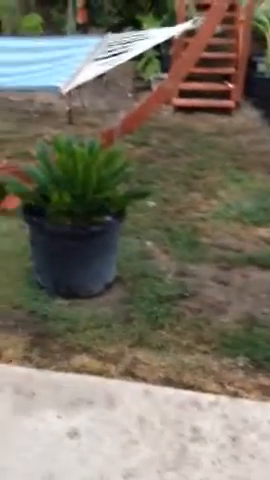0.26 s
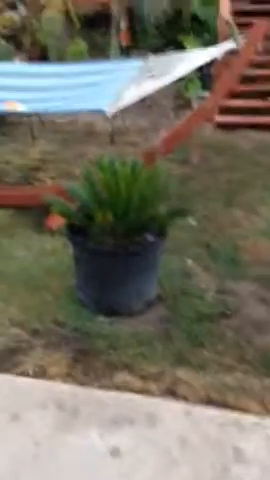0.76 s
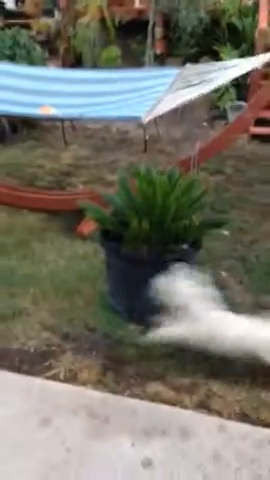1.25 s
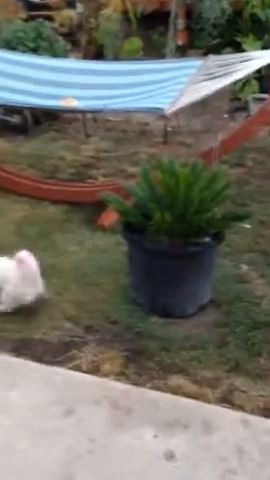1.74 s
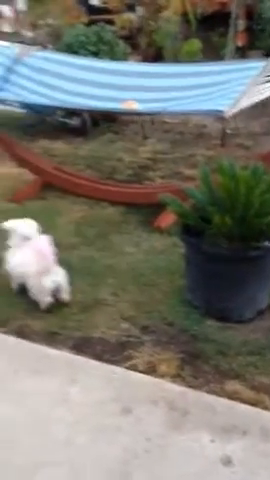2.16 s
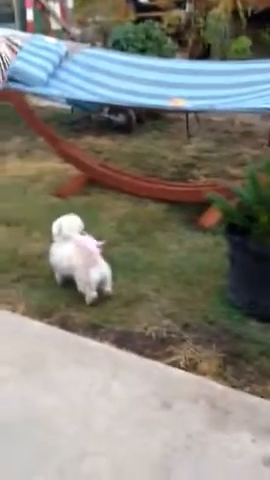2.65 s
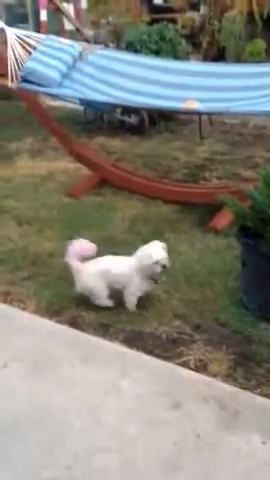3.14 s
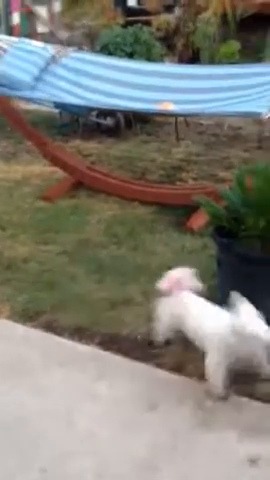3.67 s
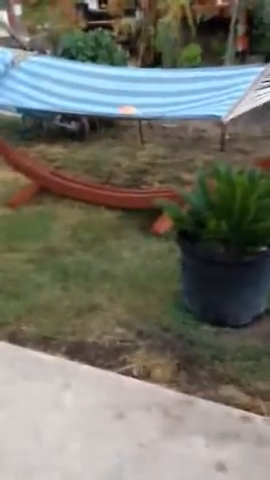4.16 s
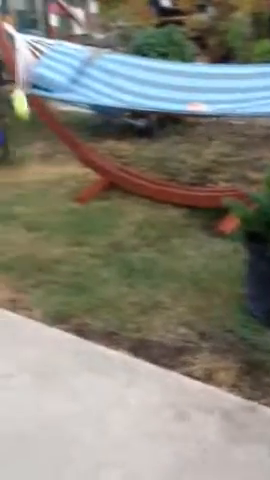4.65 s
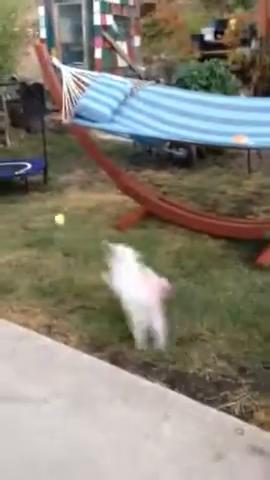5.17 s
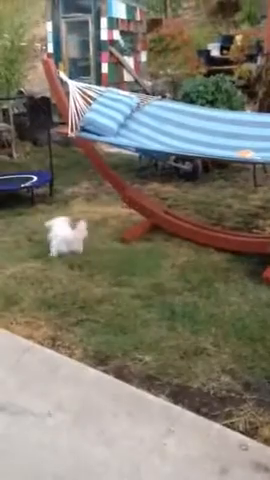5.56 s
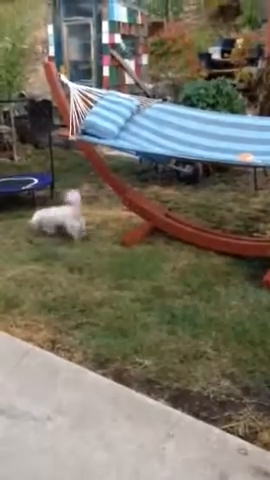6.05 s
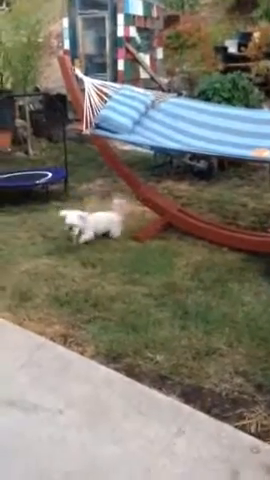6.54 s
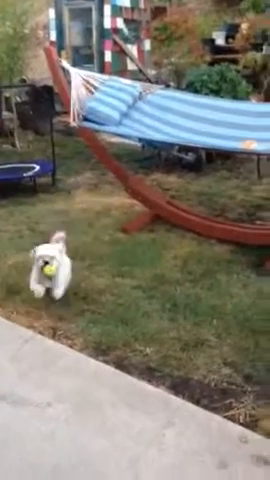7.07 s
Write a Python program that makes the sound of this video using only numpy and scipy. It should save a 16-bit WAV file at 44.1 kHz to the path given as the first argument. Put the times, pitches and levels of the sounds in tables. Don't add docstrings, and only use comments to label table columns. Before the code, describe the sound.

In a quiet backyard, a small dog's tags jingle and claws scrabble on gritty concrete after one loud, hollow tennis ball bounce.

```python
import sys
import numpy as np
from scipy import signal
from scipy.fft import rfft, irfft
from scipy.io import wavfile
from scipy.ndimage import uniform_filter1d

SR = 44100
rng = np.random.default_rng(int(sys.argv[2]) if len(sys.argv) > 2 else 0)


def output_pcm(signal):
    pcm = np.clip(np.atleast_2d(signal).T, -1, 1) * 32767
    wavfile.write(sys.argv[1], SR, np.round(pcm).astype(np.int16))


def rack_gain(trim_db):
    fader = np.asarray(trim_db, float)
    return 10 ** (fader / 20)


N = 322371

# pitch_hz, level_db (per Hz)
AIR_COLOUR = [(12, -65.5), (20, -55), (47, -9.5), (66, -6.5), (121, -6.5), (148, -14.5), (189, -12.5),
              (264, -18.5), (544, -33), (625, -30.5), (1320, -36.5), (3690, -31.5), (15200, -33.5)]
AIR_DB, HUM_HZ, HUM_DB = -58.5, 64, -62
# time_s, level_db
STIR = [(0.0, -67), (0.55, -66), (0.94, -65), (1.69, -67), (2.3, -74), (3.7, -70), (4.36, -66), (4.91, -63),
        (5.07, -69), (5.54, -64.5), (5.78, -71.5), (6.21, -76.5), (6.54, -70), (7.31, -73.5)]
STIR_REST_DB, TREAD_FOLLOWS = -68.5, 0.49

# start_s, peak_db, centre_hz
CLAWS = [(0.0497, -42, 5970), (0.1855, -45, 8660), (0.3047, -42, 8530), (0.625, -35, 9050),
         (0.8644, -44, 6960), (1.0827, -27.5, 9200), (1.3808, -29, 9300), (3.1104, -38, 8240),
         (3.1184, -39, 7500), (3.4182, -33, 9280), (3.4291, -32, 8200), (3.5215, -41, 10500),
         (3.85, -46, 7000), (4.2, -42, 7000), (1.375, -39, 9000), (3.6441, -43, 6090), (3.66, -44, 6090),
         (3.7324, -35, 10500), (4.1577, -37, 6900), (4.2495, -35, 7120), (4.3848, -27, 8140),
         (4.391, -34, 9500), (4.4987, -37, 8290), (5.0275, -22, 4800), (6.6278, -42.5, 7140),
         (0.4135, -42, 5200), (3.148, -47, 8500), (2.835, -45, 9200), (4.95, -40, 11000),
         (4.399, -22, 9000), (7.1831, -38, 8220), (7.256, -42, 5330)]
# start_s, peak_db
EDGES = [(0.2114, -52), (0.414, -41), (0.4998, -46), (0.6314, -45), (0.824, -38), (0.8415, -37),
         (0.893, -36), (0.9263, -40), (1.0897, -28), (1.725, -36), (2.041, -48), (2.077, -32),
         (3.4398, -27), (3.7172, -31), (3.749, -39), (3.7537, -23.5), (3.8117, -31), (4.276, -30),
         (4.335, -24.5), (4.3984, -17.5), (4.7508, -24), (4.9232, -20), (5.0945, -30), (5.0975, -26),
         (5.3921, -42), (5.512, -36.5), (5.5558, -39), (6.9532, -33.5), (7.1945, -37)]
# start_s, peak_db, centre_hz
PADS = [(0.192, -53, 1470), (0.298, -44, 2160), (0.702, -53, 2290), (0.775, -54, 1500), (0.805, -56, 584),
        (0.972, -53, 519), (1.109, -57, 1440), (1.214, -53, 837), (1.356, -55, 751), (4.949, -48, 611),
        (4.989, -43, 501), (5.026, -40, 2380), (5.098, -49, 2180), (5.508, -58, 2300), (5.585, -58, 2000),
        (5.6, -59, 2100), (5.645, -55, 1700), (6.76, -58, 1700), (7.055, -58, 1600), (7.113, -60, 794),
        (4.887, -38, 2800), (4.842, -32, 3000)]
EDGE_HZ, EDGE_T60_S, CLAW_T60_S, TICK_WIDTH_HZ = 10060, 0.02, 0.019, 3700
PAD_T60_S, PAD_WIDTH_HZ, PAD_LIFT_DB = 0.035, 1500, 4
CHATTER_S, KNOCK_S, SMOOTH = 0.005, 0.0009, 0.45

TAG_HZ = [6090, 8330, 10200, 10950, 13770, 14600]
# start_s, peak_db
LARGE_TAG = [(0.0503, -62), (0.2079, -60), (0.2534, -56), (0.5008, -58), (0.6245, -52), (2.076, -60),
             (2.815, -58), (2.8424, -54), (3.118, -50), (3.4291, -43), (3.4401, -44), (3.645, -46),
             (3.661, -42), (3.755, -42), (4.2173, -58), (4.336, -34.5), (4.553, -49), (5.097, -29),
             (7.1414, -51)]
# start_s, peak_db
SMALL_TAG = [(2.095, -50), (2.8409, -51), (3.4296, -41), (3.4404, -50), (3.076, -57), (4.3136, -59),
             (4.3855, -38), (4.5381, -49)]
# start_s, peak_db
BUCKLE = [(0.2553, -52), (0.628, -42), (2.0433, -59), (3.4413, -35), (3.7483, -27), (3.754, -26),
          (4.3986, -13)]
# start_s, peak_db
NAME_DISC = [(0.4124, -53), (0.4978, -61), (0.5751, -55), (0.628, -58), (0.9273, -57), (2.0783, -43),
             (2.1839, -59), (3.1174, -53), (3.1727, -60), (3.6451, -49), (3.6606, -46), (3.8117, -54),
             (4.2743, -40.5), (4.3355, -40), (4.5141, -47.5), (4.6146, -43), (4.7511, -34), (5.0955, -33),
             (5.099, -30), (5.3926, -48.5), (6.8274, -61), (7.1945, -52)]
# start_s, peak_db
HOOK = [(3.6446, -52), (3.6596, -46), (3.7554, -44), (4.2752, -40), (4.3994, -40), (5.0974, -42)]
# start_s, peak_db
SPLIT_RING = [(0.0508, -52), (0.2119, -49), (0.2543, -47), (0.413, -44), (2.0428, -42), (2.0785, -39),
              (2.8424, -48), (3.117, -39), (3.4291, -31), (3.7184, -37), (3.7324, -44), (3.8116, -37),
              (4.4514, -35), (4.7535, -39), (4.9227, -33), (6.9556, -51)]
# start_s, peak_db
CHARM = [(0.414, -54), (5.1756, -56)]
# pitch_hz, gentle_t60_s, t60_loss_db (per dB of strike)
PIECES = [
    (6080, 0.074, 0.5),
    (8170, 0.051, .01),
    (10520, 0.039, 0.5),
    (10890, .085, 0.2),
    (13900, .047, -0.2),
    (14370, .052, 0.05),
    (5620, .09, .01),
]
GENTLE_DB, FLUTTER_DB = -53.5, 1.8
HEAD_SHARE, TAIL_DB, TAIL_SHARE = 0.75, -19, 1.5

# peak_s, peak_db, rise_s, fall_s
RATTLES = [(.214, -58, 0.032, .06), (.252, -63, .025, .11), (2.05, -56.5, .045, .07),
           (2.076, -53, .025, .095), (2.844, -49.5, 0.052, 0.036), (2.91, -63, .07, .03)]

# peak_s, peak_db, rise_s, fall_s, dull_share_db
SCUFFS = [(.31, -57, .05, .025, -4), (.86, -62, 0.13, .1, -10), (.926, -61.5, 0.009, 0.022, -15),
          (3.425, -57, .02, 0.096, -17), (3.666, -54.5, 0.017, 0.054, -26), (3.76, -58.5, 0.13, .06, -14),
          (5.16, -62, 0.12, 0.18, -24), (5.404, -60.5, .02, .05, -18), (5.51, -63.5, 0.071, .1, -11),
          (5.66, -61.5, .25, 0.15, -4), (6.962, -66.5, .07, 0.19, -15.5), (7.146, -58.5, .015, 0.014, -15),
          (7.188, -55, 0.016, 0.027, -28)]
# peak_s, peak_db, rise_s, fall_s, dull_share_db
SCRAPES = [(4.26, -50, 0.032, 0.028, -15), (4.46, -52, .1, .09, -7.5), (4.508, -52, 0.077, 0.037, -19),
           (4.558, -49, .03, .014, -13), (4.775, -49.5, .04, .07, -18), (4.829, -35, .05, .02, -12),
           (4.843, -32, .014, .04, -10), (5.013, -43, .014, .008, -20), (4.99, -55, .08, 0.056, -5),
           (5.048, -56, .015, 0.096, -11), (5.1, -39, 0.0079, 0.014, -22)]
# peak_s, peak_db, rise_s, fall_s, dull_share_db
SKIDS = [(4.64, -40, .014, .03, -20), (4.678, -34, .004, .07, -19), (4.7, -41, .012, .03, -15),
         (4.722, -42, .04, .03, -11), (4.862, -45, .012, .015, -20), (4.884, -43, .025, .03, -15),
         (4.4, -47, .006, .025, -8), (4.93, -47, .006, .025, -26)]
# peak_s, peak_db, rise_s, fall_s, dull_share_db
DRAGS = [(4.062, -51, .01, .014, -6), (4.09, -63, .06, .05, -2), (4.126, -41.5, .026, .045, -5),
         (4.593, -37, .022, .05, -14), (5.029, -30, .013, .011, -19)]
# pitch_hz, level_db (per Hz)
GRIT = [(1470, -19.5), (2500, -12), (2790, -11), (3180, -4), (5780, 2), (10100, -1), (14300, -8),
        (15600, -11), (16000, -35)]
# pitch_hz, level_db (per Hz)
DULL = [(290, -44.5), (500, -18), (749, -12.5), (1130, -2), (2300, 1), (2700, -14), (3200, -6), (4160, -21),
        (7040, -120)]
# pitch_hz, change_db
SKID_TILT = [(3000, -6), (7000, 0), (11500, 4), (15000, 3)]
# pitch_hz, change_db
DRAG_TILT = [(4000, 3.5), (9000, 0), (12500, -6)]
SWELL_DB, BEND, DULL_LINGER = -22, 1.15, 1.13

# start_s, peak_db, pitch_hz
THUDS = [(0.778, -54, 266), (0.843, -51.5, 170), (0.973, -56, 145), (1.106, -56, 177), (1.181, -55.5, 121),
         (1.23, -56, 120), (1.353, -50.5, 141), (1.504, -52, 151), (3.101, -60.5, 197), (4.02, -44, 261),
         (4.442, -50.5, 138), (4.842, -47.5, 127), (4.949, -47.5, 128), (4.984, -38, 253),
         (5.038, -39, 332), (5.399, -50, 354), (5.474, -46, 200), (5.508, -55, 250), (5.585, -54, 230),
         (5.662, -54, 280), (5.552, -53, 192), (5.62, -55, 300), (6.255, -55, 122)]
THUD_T60_S, THUD_CYCLES = 0.028, 2.4

# peak_s, peak_db, rise_s, fall_s, upper_resonance_db (over the peak)
PANTS = [(1.731, -61.5, .026, .032, 8), (3.79, -59.5, .07, 0.08, -8), (4.126, -54.5, .13, 0.051, 1)]
# pitch_hz, width_hz, level_db
MOUTH = [(780, 80, 1.0), (1051, 220, -1), (1400, 180, -7), (2320, 190, -2.5)]

BOUNCE_S, BOUNCE_DB, CONTACT_S = 3.9593, -9, 0.00605
FELT_HZ = 8500
# delay_s, level_db
CLOSE_ECHOES = [
    (.00244, -16.5),
    (.00455, -15.6),
]
# delay_s, level_db
WALL_ECHOES = [(0.0138, -24), (0.0158, -22), (0.0217, -29)]

# peak_s, peak_db, centre_hz
SNAPS = [(4.1161, -32, 6700), (4.1249, -31, 6500), (4.1361, -33, 6600), (4.1408, -33, 6500),
         (4.1603, -35, 6400), (4.2003, -42, 7000), (4.2495, -35, 8000), (4.2765, -29, 12000),
         (4.3365, -29, 10000), (4.3852, -29, 8700), (4.3884, -30, 8100), (4.3999, -17, 9800),
         (4.4014, -24, 11200), (4.4397, -35, 9000), (4.5152, -36, 8900), (4.5808, -27, 7000),
         (4.5968, -25, 8000), (4.6376, -26, 8900), (4.6478, -30, 7600), (4.6737, -33, 7000),
         (4.6756, -28, 9300), (4.6909, -23, 9000), (4.7216, -28, 8700), (4.7632, -32, 7700),
         (4.7778, -32, 7700), (4.8086, -30, 7600), (4.8219, -25, 7300), (4.8267, -23, 8200),
         (4.842, -19, 6900), (4.8536, -26, 8000), (4.8602, -26, 8400), (4.862, -25, 7900),
         (4.8651, -25, 8600), (4.8673, -26, 8800), (4.8881, -27, 7300), (4.8915, -25, 8500),
         (4.9207, -36, 7100), (4.9226, -26, 11500), (4.9246, -20, 10900), (4.9674, -37, 7800),
         (5.0127, -27, 7800), (5.0307, -19, 7000), (5.0953, -25, 9000), (5.0981, -23, 8700),
         (5.0998, -25, 9100)]
SNAP_CYCLES, SNAP_TRIM_DB = 1.1, 0.5

# pitch_hz, t60_s
YARD = [(150, 0.14), (500, 0.15), (1500, 0.14), (4000, 0.13), (9000, 0.11)]


def evened(x):
    return x / np.sqrt(np.mean(x ** 2) + 1e-20)


def read(points, hz):
    f, value = np.transpose(points)
    return np.interp(np.log(hz + 1), np.log(f + 1), value)


def add(mix, s, sound):
    part = mix[round(s * SR):][:len(sound)]
    part += sound[:len(part)]


def coloured(x, points):
    gain = rack_gain(read(points, np.fft.rfftfreq(len(x), 1 / SR)))
    return evened(irfft(rfft(x) * gain, len(x)))


def resonate(x, hz, width):
    r = np.exp(-np.pi * width / SR)
    ringing = signal.lfilter([1 - r], [1, -2 * r * np.cos(2 * np.pi * hz / SR), r * r], x)
    return ringing * np.sin(2 * np.pi * hz / SR)


def swells(rows, lift=False, linger=1):
    t = np.arange(0, N / SR, .0005)
    power = np.zeros(len(t))
    for s, db, rise, fall, *more in rows:
        before, after = (s - t) / max(rise, .002), (t - s) / max(fall, .002)
        away = np.where(t < s, before, after) / linger
        peak_db = db + (more[0] if lift else 0)
        power += rack_gain(peak_db + SWELL_DB * np.minimum(away, 10) ** BEND) ** 2
    return np.interp(np.arange(N) / SR, t, np.sqrt(power))


def air():
    frames, hz = N // 256 + 5, np.fft.rfftfreq(1024, 1 / SR)
    a, b, patches = rng.standard_normal((frames, 513, 3)).T
    patches = evened(uniform_filter1d(uniform_filter1d(patches, 10, 0), 12, 1))
    depth_db = read([(300, 2.0), (3000, .7)], hz)[:, None]
    insects = 1 + .55 * np.exp(-((hz[:, None] - 5300) / 150) ** 2)
    spectrum = (a + 1j * b) * insects * rack_gain(depth_db * patches)
    hiss = signal.istft(spectrum, nperseg=1024, noverlap=768)[1][:N]
    hum = evened(resonate(rng.standard_normal(N), HUM_HZ, 2.3))

    slow = uniform_filter1d(rng.standard_normal(N), 500, mode="wrap")
    slow = uniform_filter1d(slow, 500, mode="wrap")
    lumps = rack_gain(5.0 * np.tanh(evened(slow)))
    rustle = coloured(rng.standard_normal(N) * lumps,
                      [(300, -32), (700, 3.0), (2200, 2.5), (5000, -5.5), (12000, -14.5)])
    tread = coloured(rng.standard_normal(N) * lumps,
                     [(120, -27.0), (250, 1.5), (550, -7.5), (1000, -28.5), (2000, -67)])
    busy_db = np.interp(np.arange(N) / SR, *np.transpose(STIR))
    tread_db = STIR_REST_DB + TREAD_FOLLOWS * (busy_db - STIR_REST_DB)
    stir = rack_gain(busy_db - 3.0) * rustle + rack_gain(tread_db - 3.0) * tread
    return rack_gain(AIR_DB) * coloured(hiss, AIR_COLOUR + [(15500, -58.0)]) + rack_gain(HUM_DB) * hum + stir


def ticks():
    out, t = np.zeros(N), np.arange(1500) / SR
    rows = [(*row, CLAW_T60_S, TICK_WIDTH_HZ) for row in CLAWS]
    rows += [(*row, EDGE_HZ, EDGE_T60_S, TICK_WIDTH_HZ) for row in EDGES]
    rows += [(s, db + PAD_LIFT_DB, hz, PAD_T60_S, PAD_WIDTH_HZ) for s, db, hz in PADS]
    noises, lucks = rng.standard_normal((len(rows), 1500)), rng.random((len(rows), 3))
    for (s, db, hz, t60, width), noise, luck in zip(rows, noises, lucks):
        since = t - CHATTER_S * np.array([0, *luck])[:, None]
        knocks = SMOOTH + ((since >= 0) * np.exp(-abs(since) / KNOCK_S)).max(0)
        shape = rack_gain(-60 * t / max(t60, .004)) * (1 - np.exp(-t / 0.0012))
        burst = resonate(np.diff(shape * knocks * noise), hz, width)
        burst = resonate(burst, hz, 3.5 * width)
        add(out, s, rack_gain(db - 4.5) * burst / abs(burst).max())
    return out


def tags():
    out, t = np.zeros(N), np.arange(5000) / SR
    rise = 1 - np.exp(-t / .0016)
    rings = []
    strikes = [LARGE_TAG, SMALL_TAG, BUCKLE, NAME_DISC, HOOK, SPLIT_RING, CHARM]
    for rows, (hz, t60, lost) in zip(strikes, PIECES):
        for s, db in rows:
            rings.append((s, db, hz, t60 / rack_gain(lost * (db - GENTLE_DB))))
    for (s, db, hz, t60), luck in zip(rings, rng.random((len(rings), 15))):
        twin_hz = hz * (1 + 0.02 * (luck[0] - .5))
        pair = np.sin(2 * np.pi * hz * t) + .6 * np.sin(2 * np.pi * twin_hz * t)
        others = sum(rack_gain(-13 - 20 * w) * np.sin(2 * np.pi * f * t) for f, w in zip(TAG_HZ, luck[1:7]))
        life_db = 60 * t / max(t60, .01)
        fade = rack_gain(db - 3.5 - life_db / HEAD_SHARE) + rack_gain(db + TAIL_DB - life_db / TAIL_SHARE)
        ring = fade * rise * (pair + others)
        add(out, s, ring)
        for late, size in luck[7:].reshape(4, 2):
            add(out, s + 0.011 * late, 0.2 * size * ring)
    flutter = evened(uniform_filter1d(uniform_filter1d(rng.standard_normal(N), 90), 90))
    return out * rack_gain(FLUTTER_DB * flutter)


def rattle():
    knocks = rng.standard_normal((len(TAG_HZ) + 1, N)) * (rng.random(N) < 700 / SR)
    weights_db = [3.0, 0, -6.0, -1, -6, 0.0]
    hum = sum(rack_gain(db) * evened(resonate(k, hz, 40)) for k, hz, db in zip(knocks, TAG_HZ, weights_db))
    rasp = coloured(rng.standard_normal(N) + 4 * knocks[-1],
                    [(2000, -32.0), (4000, 1), (9000, -0.5), (15000, -3)])
    return rack_gain(-3) * (evened(hum) + 0.66 * rasp) * swells(RATTLES)


def paws():
    clumps = rack_gain(2.8 * np.tanh(evened(uniform_filter1d(rng.standard_normal(N), 130))))
    crack_size = rack_gain(2.4 * np.minimum(rng.exponential(1, N), 2.4))
    cracks = rng.standard_normal(N) * crack_size * (rng.random(N) < .25)
    grain = (evened(cracks) + .6 * rng.standard_normal(N)) * clumps
    grit = coloured(grain, GRIT)
    bright = grit * swells(SCUFFS + SCRAPES)
    bright += coloured(grit, SKID_TILT) * swells(SKIDS)
    bright += coloured(grit, DRAG_TILT) * swells(DRAGS)
    dull = coloured(grain, DULL) * swells(SCUFFS + SCRAPES + SKIDS + DRAGS, True, DULL_LINGER)
    return bright + rack_gain(-6.0) * dull


def landings():
    out, t = np.zeros(N), np.arange(4000) / SR
    for (s, db, hz), noise in zip(THUDS, rng.standard_normal((len(THUDS), 4000))):
        t60 = THUD_T60_S + THUD_CYCLES / hz
        puff = coloured(noise, [(100, -5.5), (300, 3.5), (650, -13), (1500, -11), (4000, -24)])
        sag = 1 - np.exp(-t / 0.0067)
        push = np.sin(2 * np.pi * hz * (0.73 * t + 0.0045 * sag))
        push += 0.44 * puff + 0.76 * np.sin(2 * np.pi * 125 * t)
        fade = rack_gain(db + 6.5 - 60 * t / max(t60, .01))
        add(out, s + .004, fade * (1 - np.exp(-t / 0.0018)) * push)
    return out


def panting():
    flow = rng.standard_normal(N)
    bands = []
    for hz, width, db in MOUTH:
        bands.append(rack_gain(db) * evened(resonate(resonate(flow, hz, 2 * width), hz, width)))
    return evened(sum(bands[:2])) * swells(PANTS) + sum(bands[2:]) * swells(PANTS, True)


def ball():
    out, t = np.zeros(N), np.arange(1500) / SR
    touching = np.clip((CONTACT_S - t) / 0.00069, 0, 1) * (1 - np.exp(-t / 0.0049))
    flex = rack_gain(-4.4) * touching * np.sin(2 * np.pi * 295 * (t - .00023))
    pitch_hz = 755 + 1620 * np.exp(-t / 0.000735)
    pock_fade = rack_gain(6.2 - 60 * t / 0.005) * (1 - np.exp(-t / 0.00027))
    pock = -pock_fade * np.sin(2 * np.pi * np.cumsum(pitch_hz) / SR)
    pock -= rack_gain(-11.5 - 60 * t / .0059) * np.sin(2 * np.pi * 3040 * t)
    after = rack_gain(-20.6 - 60 * t / 0.0259) * np.sin(2 * np.pi * 1220 * t)
    after += rack_gain(-15 - 60 * t / 0.035) * np.sin(2 * np.pi * 200 * t)
    add(out, BOUNCE_S, rack_gain(BOUNCE_DB) * (flex + pock + after))
    for delay_s, db in CLOSE_ECHOES:
        add(out, BOUNCE_S + delay_s, rack_gain(BOUNCE_DB + db) * pock)
    return signal.lfilter(*signal.butter(2, FELT_HZ, fs=SR), out)


def snaps():
    out, t = np.zeros(N), np.arange(-40, 120) / SR
    for (s, db, hz), luck in zip(SNAPS, rng.random(len(SNAPS))):
        span = np.where(t < 0, .4, 1) * SNAP_CYCLES / hz
        crack = np.exp(-abs(t) / span) * np.cos(2 * np.pi * (hz * t + luck))
        add(out, s + t[0], rack_gain(db + SNAP_TRIM_DB) * crack)
    return out


def yard(x):
    taps = np.zeros(SR // 2)
    at = np.arange(60, len(taps) - 20, 20)
    taps[at + rng.integers(0, 20, len(at))] = rng.choice([-1., 1.], len(at))
    hz, t, z = signal.stft(taps, SR, nperseg=256)
    fade = rack_gain(-60 * t / read(YARD, hz)[:, None])
    tail = signal.istft(z * fade, SR, nperseg=256)[1]
    return signal.fftconvolve(x, tail / np.linalg.norm(tail))[:N]


def scene():
    near = ticks() + tags() + rattle() + paws() + landings() + panting() + snaps()
    bounce = ball()
    walls = sum(rack_gain(db) * np.roll(bounce, round(s * SR)) for s, db in WALL_ECHOES)
    echoes = yard(rack_gain(-12) * near + rack_gain(-15.5) * bounce)
    return (near + bounce + walls + echoes + air())[None]


def low_pass(x):
    return signal.sosfilt(signal.butter(12, 16200, fs=SR, output="sos"), x)


def record(dry):
    hz = np.fft.rfftfreq(N, 1 / SR)
    edges_db = [(20, -8.0), (55, 0), (15250, 0.5), (15550, -22.5), (16200, -31), (16400, -70)]
    heard = irfft(rfft(dry) * rack_gain(read(edges_db, hz)), N)
    return low_pass(heard)


dry = scene()
out = record(dry)
output_pcm(out)
```